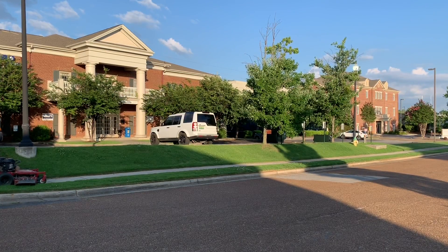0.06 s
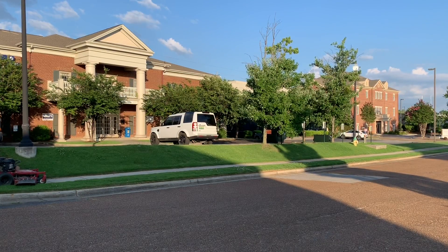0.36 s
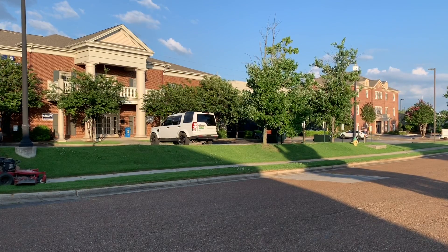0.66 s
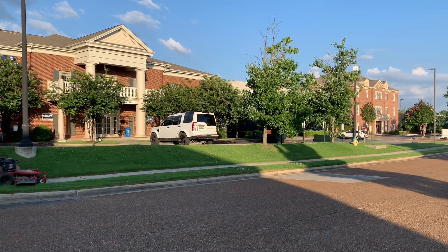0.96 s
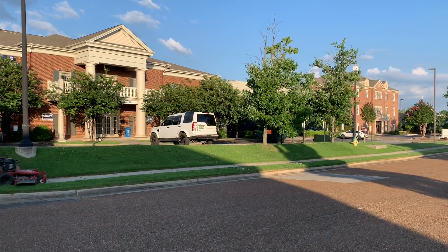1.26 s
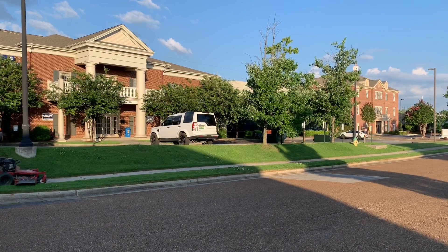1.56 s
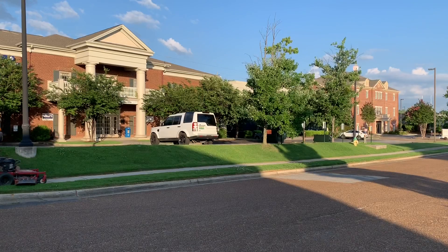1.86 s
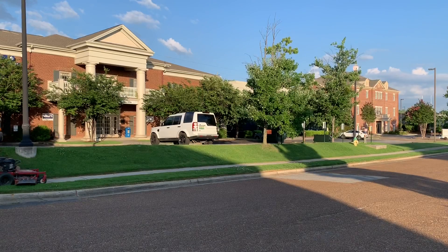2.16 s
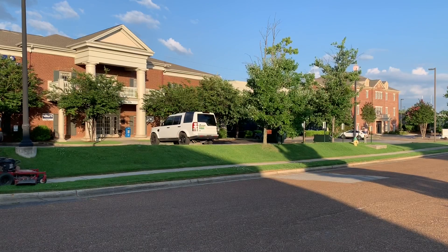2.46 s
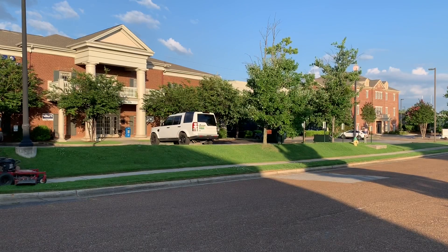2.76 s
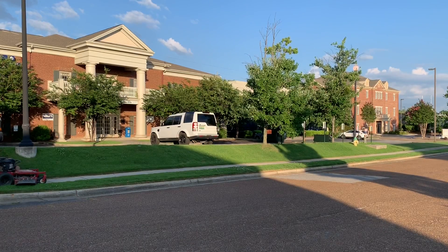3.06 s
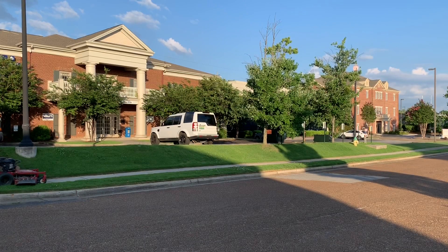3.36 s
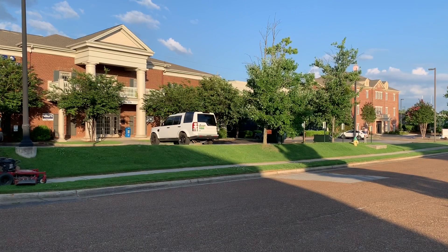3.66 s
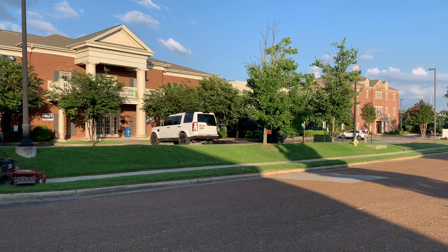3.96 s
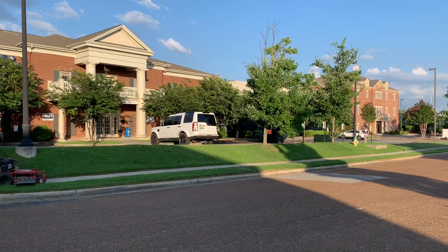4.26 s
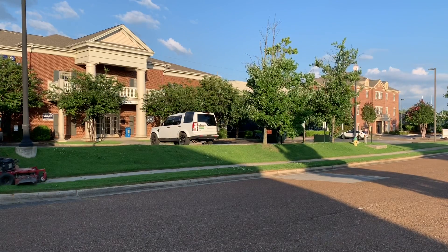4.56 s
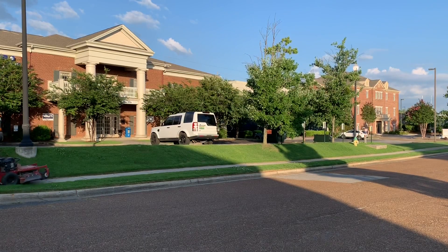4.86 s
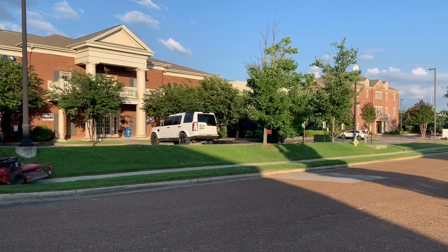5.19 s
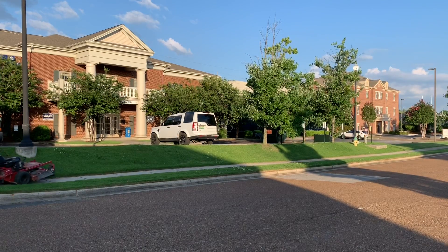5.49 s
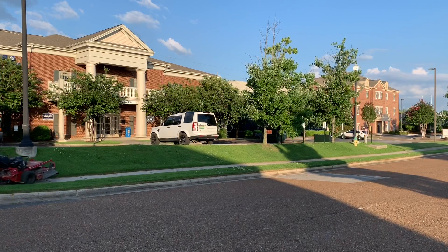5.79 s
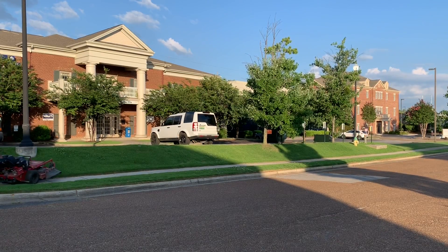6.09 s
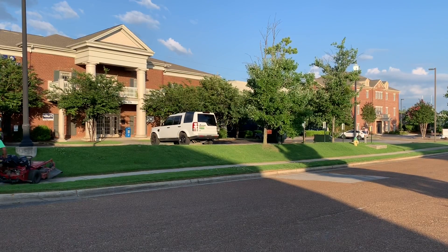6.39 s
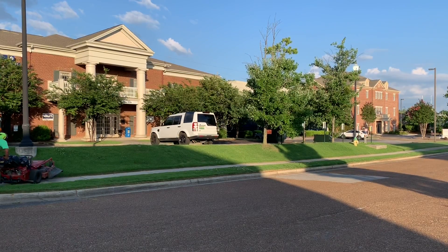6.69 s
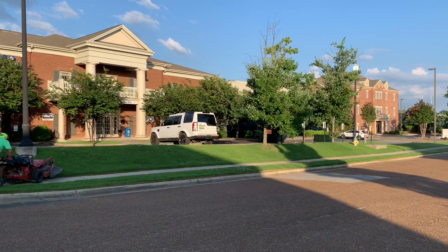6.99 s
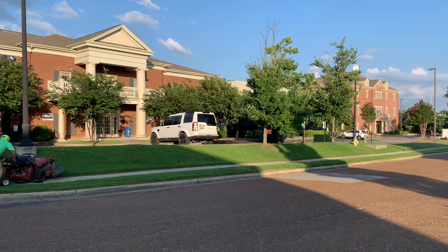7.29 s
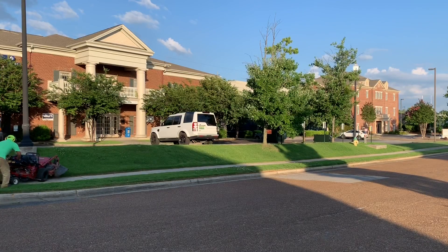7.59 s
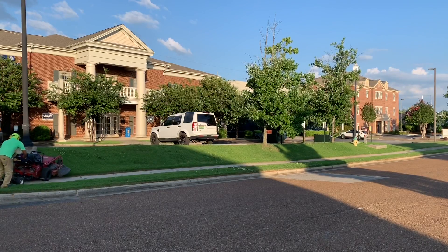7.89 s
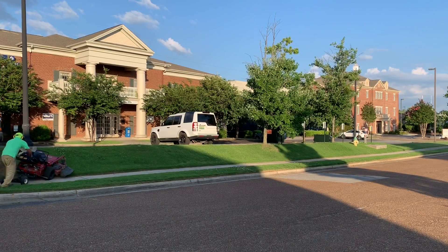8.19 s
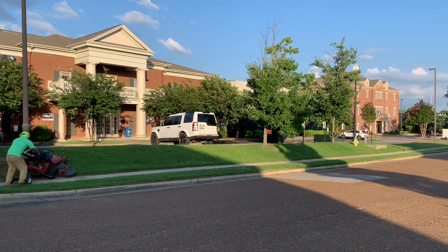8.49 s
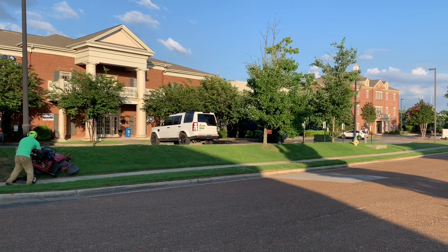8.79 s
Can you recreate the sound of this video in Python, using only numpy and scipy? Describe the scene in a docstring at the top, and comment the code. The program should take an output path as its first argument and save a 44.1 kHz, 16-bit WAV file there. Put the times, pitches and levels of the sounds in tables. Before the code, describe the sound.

A petrol walk-behind mower idles outdoors, puttering with ticking valves over a low wind-like rumble. Dull knocks and light gusts bump the microphone during the first second. At about 1.5 seconds a lever clacks with brief bright scrapes. At 1.9 seconds the throttle opens and the engine revs up, louder, its pitch wavering briefly. A dull thump comes at 2.8 seconds. At 3.2 seconds the blades engage with a rasp and the engine sags sharply, recovering by about 4.4 seconds. From there it mows loudly and steadily, with a wavering blade hum, a rough high whine, rushing air and hissing grass. The cutting thickens around 5.4 seconds, and the mower's deck booms more fully around 7 seconds. The hiss and ticking ease slightly as it turns away, still running at the end, near 9 seconds.

```python
"""Petrol mower across a street

A walk-behind mower with a V-twin engine idles, is throttled up, sags as the blades are clutched in,
recovers, mows and swings its deck away. Periodic excitation sets the sound: each four-stroke cycle
gives two exhaust pulses and four valve hits, the blades hum and rush, and their drive whines.
A low wind-like rumble swells and ebbs behind it. Knocks, a lever and light gusts are heard early on."""
import sys
import numpy as np
from scipy import signal
from scipy.fft import rfft, irfft, next_fast_len
from scipy.io import wavfile
from scipy.ndimage import uniform_filter1d

SR = 44100
rng = np.random.default_rng(int(sys.argv[2]) if len(sys.argv) > 2 else 0)


def master_out(mix):
    """Clip the mix to full scale and print it as 16-bit PCM to the path in sys.argv[1]."""
    frames = np.transpose(np.atleast_2d(mix))
    ceiling = np.clip(frames, -1, 1)
    pcm = np.round(ceiling * 32767).astype(np.int16)
    wavfile.write(sys.argv[1], SR, pcm)


N = 389844
T = np.arange(N) / SR

IDLE_RATE, THROTTLE_S = 15.43, 1.91  # four-stroke cycles per second; when the throttle opens
FIRING_PLACES, BLADE_PASSES_PER_CYCLE = (0, .375), 4.41
CLUTCH_S, SAG_S, RECOVER_S = 3.18, .24, .91  # when the clutch bites; lengths of the fall and the recovery
# hardest work, in the run-up and as the blades reach speed: (centre [s], half-width [s])
REVVING, STRAINING = (2.08, 0.24), (3.93, 0.32)
# a thick patch of grass, and the deck side-on to the listener: (centre [s], half-width [s])
THICK_GRASS, BROADSIDE = (5.4, 0.51), (7.18, 1)

# engine parts: (idle level [dB], running level [dB], then change [dB] with revving, blades engaged,
# sagging speed, straining, swinging away)
EXHAUST_DB = (-44.5, -37.5, 4, 4, 0.5, 5, 2)
VALVE_HISS_DB = (-55, -47.5, 2, 4.5, 0, 1.5, -3.5)
ROCKER_DB = (-39, -31.5, -1, 0.5, -2, -0.5, -10.5)
SEAT_DB = (-38.5, -40.5, 3, -1.5, 6, 6, -4)
CASING_DB = (-37, -29.5, -0.5, 4, -0.5, -1, 1)
# deck sounds: (level [dB], then change [dB] with sagging speed, facing side-on, swinging away)
WHINE_DB, RUSH_DB, GRASS_DB = (-23, -16, 3, -0.5), (-27, -0.5, 2, -6.5), (-31.5, -3, 3, -5.5)

# wind-like background rumble: (early level [dB], later level [dB], then five changes [dB] in staged_level)
RUMBLE_DB = (-32.5, -23.5, -0.5, -2.5, 0, 3.5, 2.5)
# its brief swells and ebbs: (centre [s], half-width [s], change [dB])
RUMBLE_SWELLS = [(0.319, 0.33, 4.5), (.92, 0.1, 3), (2.15, .2, 2.5), (2.95, .3, -1.5), (3.65, 0.26, 2.5),
                 (5.68, 0.11, 4), (5.91, 0.045, 6), (6.75, 0.26, 1.5)]
# light gusts: (centre [s], half-width [s], level [dB])
WIND_GUSTS = [(.22, 0.077, -35), (.38, 0.048, -30), (.78, 0.046, -28), (.91, 0.055, -41),
              (1.045, .025, -34)]
# dull knocks: (time [s], pitch [Hz], thud level [dB], puff level [dB])
DULL_KNOCKS = [(0.167, 126, -26, -33), (0.19, 190, -27, -28), (0.286, 150, -30, -31), (0.329, 75, -16, -34),
               (0.391, 230, -16, -20.5), (0.467, 140, -21, -26), (.643, 109, -19, -31),
               (0.739, 170, -16, -31), (0.773, 240, -30, -25), (0.855, 140, -14, -34), (.893, 70, -13, -35),
               (1.022, 95, -12, -36), (1.368, 55, -17, -35), (1.695, 65, -11, -27), (2.776, 132, -5, -29),
               (3.007, 70, -9, -34)]
# bright scrapes: (time [s], length [s], level [dB])
BRIEF_SCRAPES = [(1.439, 0.046, -38), (1.485, 0.064, -33), (1.525, .02, -41), (3.07, 0.08, -32.5),
                 (7.772, 0.047, -50), (8.654, 0.018, -29)]
# lever impacts: (time [s], level [dB])
LEVER_CLACKS = [(1.453, -29.5), (1.504, -39), (1.527, -28)]
# modes rung by the lever: (frequency [Hz], relative level [dB], time to fall 60 dB [s])
HANDLE_MODES = [(455, -2, 0.1), (560, -6, 0.072), (817, -4, 0.044), (3760, -1, .035), (4300, -7, 0.13),
                (7250, -9, .07)]
# speed set by the governor: (time [s], rate [cycles/s])
GOVERNED_SPEED = [(2.2, 26.85), (4.45, 26.8), (5, 26.3), (5.55, 26.22), (6.65, 26.52), (7.4, 26.3),
                  (7.8, 26.63), (8.6, 26.07)]
# fan and pulley tones: (start [s], end [s], multiple of the cycle rate [1], flutter width [Hz],
# steady part against flutter [1], level [dB])
PULLEY_TONES = [(2.21, 2.39, 42, 7.1, -1, -39.5), (2.4, 2.95, 42, 9, 1.5, -39),
                (3.3, 4.25, 45, 130, -0.5, -31.5), (3.5, 8.836, 152.5, 27, 0, -45),
                (8.3, 8.46, 151, 26, -1, -35.5), (4.46, 6.6, 248, 25, 0, -52),
                (5.55, 6.37, 38, 20, 1, -32.5), (5.15, 6.45, 46.5, 80, -3, -37),
                (5.2, 8.293, 58.8, 3.1, 2.3, -37.5), (4.9, 8.3, 57.7, 13, 2, -47.5),
                (6.803, 10, 51.5, 16, 2, -41.5), (7.003, 8.843, 15.35, 9.5, -0.5, -33)]
# valve hits: (place in the cycle [0-1], then gain [1] of idle tick, running tick, idle ring, running ring)
VALVE_HITS = [(.095, 0.26, 0.13, 0.6, 1), (0.429, 0.66, 0.71, 0.46, .4), (.52, .1, .1, 0.73, 1),
              (.82, 0.15, 0.36, 0.21, .15)]
# casing modes that stand out at idle: (frequency [Hz], width [Hz], level [dB])
CASING_MODES = [(1750, 53, -49), (2940, 77, -66), (1294, 24, -58), (544, 18, -65), (211.5, 3, -41.5)]
# high modes of the deck: (frequency [Hz], width [Hz], level [dB])
DECK_MODES = [(3450, 35, -39.5), (4020, 34, -42), (4970, 38, -50), (6580, 40, -53)]
# hum that fades and returns as the blades drift in and out of step:
# (time [s], then level [dB] of blade-pass harmonics 1 to 4)
LOW_HARMONICS = [(3.55, -33, -31, -39, -40), (3.8, -22.5, -33, -31.5, -53), (4, -21, -23, -21, -29.5),
                 (4.2, -21, -22.5, -24, -24.5), (4.55, -17, -21, -29.5, -34),
                 (4.75, -18.5, -20.5, -27.5, -38), (5, -20.5, -25, -28.5, -28), (5.3, -20, -30.5, -33, -28),
                 (5.5, -21, -37, -32, -38), (5.75, -28, -43, -33, -32), (6.2, -44, -43, -32.5, -35),
                 (6.65, -44, -44, -26, -35), (7.15, -30, -29, -27.5, -31.5),
                 (7.35, -19.5, -33.5, -29.5, -31), (7.75, -18.5, -20, -30, -39),
                 (8.25, -17.5, -23.5, -34, -31), (8.65, -18.5, -18.5, -37, -42)]
# upper blade-pass harmonics: (harmonic [1], level [dB], change side-on [dB], change swung away [dB])
HIGH_HARMONICS = [(5, -40, 2.5, -2), (6, -40, 1.5, -7), (7, -40.5, 1, -3)]

# spectral envelopes of the sources: (frequency [Hz], relative spectral density [dB])
RUMBLE_SPECTRUM = [(10, -41), (28, -9.5), (50, 3.5), (75, 0), (110, 1), (160, -7.5), (230, -10),
                   (330, -19.5), (500, -44), (1500, -84)]
GUST_SPECTRUM = [(40, -8), (130, 8.5), (300, 0), (520, -8), (750, -25), (1500, -45)]
KNOCK_SPECTRUM = [(40, -2), (120, 1.5), (310, 1.5), (550, -1), (900, -14), (1500, -46), (4000, -70)]
SCRAPE_SPECTRUM = [(1500, 7), (4000, 10.5), (6000, 2), (8500, 9), (12000, 2), (16000, -38)]
VALVE_HISS_SPECTRUM = [(1000, -21), (3500, 4), (4600, -12), (6200, 4.5), (7200, 6.5), (7700, 3.5),
                       (8300, 9), (10200, -0.5), (12000, 5.5), (14300, -4), (16000, 0)]
ROCKER_SPECTRUM = [(1500, -23), (3500, -3), (5500, -14), (8300, 0), (9800, -3), (10800, 11.5), (12300, -5),
                   (14000, 4.5), (16000, -4)]
SEAT_SPECTRUM = [(1500, -29), (3500, -0.5), (4600, -9), (6600, -11), (7250, 6.5), (7750, -21), (8350, 3.5),
                 (9300, -11), (16000, -22)]
CASING_SPECTRUM = [(100, 6.5), (350, 9), (600, 4), (1000, 2.5), (1400, 1), (1720, 4), (2200, -4.5),
                   (2750, 4.5), (4050, -2), (4550, -16), (5200, -5), (5900, -25), (7200, -17.5),
                   (15000, -24)]
INTAKE_SPECTRUM = [(30, -5), (90, 22), (200, 14.5), (350, 5), (800, -3), (1300, 1), (1700, -23), (2400, 0),
                   (4400, -22), (5300, -6), (5800, -9), (6400, -14), (7800, -13), (8600, -13), (10500, -30),
                   (16000, -35)]
MUFFLER_SPECTRUM = [(20, -28), (45, -8), (80, -19), (130, 2), (210, 1), (270, -5), (320, -32), (410, -9),
                    (600, -17), (1200, -42), (3000, -72)]
RUSH_SPECTRUM = [(60, -27), (200, 0.5), (300, 6), (420, 6.5), (540, 5), (660, 0), (1000, 4), (1300, 2.5),
                 (1650, -5), (2000, -8), (3000, -48), (8000, -43)]
GRASS_SPECTRUM = [(1000, -6), (2000, -13), (2350, 8.5), (2650, 3), (3100, 4), (4050, 2), (4270, -8.5),
                  (4750, 0.5), (5000, 1), (5900, -6.5), (6600, -9), (7600, -19), (8600, -18), (12000, -69),
                  (16000, -40)]
CHUG_SPECTRUM = [(30, -12), (65, 10), (150, 3), (250, 3), (350, -1), (560, -11), (900, -22), (2000, -48)]
BOOM_SPECTRUM = [(150, -28), (320, 6), (430, 10), (560, 8), (720, -40), (2000, -54)]

# likeness of the two microphone ports: (frequency [Hz], coherence [0-1])
PORT_COHERENCE = [(50, .92), (130, .95), (300, .91), (1000, .86), (2000, .985), (2300, .99), (3800, .83),
                  (5000, .7), (6000, .5), (7000, .7), (8700, .72), (9800, .95), (12500, .8), (15500, .9)]
# phase by which the left port leads: (frequency [Hz], lead before the bearing factor [rad])
PORT_LEAD = [(20, 0), (250, .33), (550, .45), (850, .55), (1500, 2.1), (2150, 3.1), (2800, 3.7),
             (3700, 4.9), (4300, 5.2), (5100, 7.0), (5700, 6.8), (6800, 8.2), (9800, 3.14), (13600, -3.14),
             (15500, -6.3)]
# shading between the ports: (frequency [Hz], left minus right [dB])
PORT_SHADING = [(130, 1), (300, 1.5), (500, 1.5), (770, 7.5), (1170, 9), (1790, 0.5), (2700, -2.5),
                (4100, 1.5), (4900, -6.5), (6500, -4.5), (7600, -0.5)]
# the mower moves towards the front: (time [s], factor on the lead [1])
BEARING_FACTOR = [(0, 1.065), (3.5, 1.06), (6, 1.01), (8.84, 0.92)]


def amp(db):
    """Amplitude ratio of a level in decibels."""
    return 10 ** (np.asarray(db) / 20)


def unit(x):
    """Normalisation to rms 1."""
    return x / np.sqrt(np.mean(x ** 2) + 1e-20)


def curve(rows, column=1):
    """Linear interpolation of one column of a time table at every sample."""
    rows = np.asarray(rows)
    return np.interp(T, rows[:, 0], rows[:, column])


def spectrum_at(points, hz):
    """Interpolation of a spectrum table on a log-frequency axis."""
    f, value = np.transpose(points)
    return np.interp(np.log(hz + 1), np.log(f + 1), value)


def ramp(start, length):
    """Linear rise from 0 to 1."""
    return np.clip((T - start) / length, 0, 1)


def fade(start, end, edge_s):
    """Trapezoidal window; it stays open if it outlasts the scene."""
    return ramp(start, edge_s) * np.clip((end - T) / edge_s + (end >= T[-1]), 0, 1)


def bell(centre, half_width):
    """Gaussian swell from 0 to 1 and back."""
    return np.exp(-((T - centre) / half_width) ** 2)


def noise():
    """Uncorrelated white noise on two paths: direct and scattered."""
    return rng.standard_normal((2, N))


def drift(hz):
    """Low-pass random fluctuation of rms 1, up to about hz."""
    coarse_t = T[::64]
    f = np.fft.rfftfreq(8192, coarse_t[1])
    wander = irfft(rfft(rng.standard_normal(8192)) * np.exp(-(f / hz) ** 2))
    return np.interp(T, coarse_t, unit(wander[:len(coarse_t)]))


def colour(x, spectrum, band_hz=(0, SR)):
    """Linear filtering by a spectral envelope, scaled to rms 1 within the band."""
    size = next_fast_len(N, real=True)
    hz = np.fft.rfftfreq(size, 1 / SR)
    shaped = rfft(x - x.mean(), size) * amp(spectrum_at(spectrum, hz))
    inside = shaped[:, (hz >= band_hz[0]) & (hz <= band_hz[1])]
    return irfft(shaped, size)[:, :N] * np.sqrt(N * size / np.sum(abs(inside) ** 2))


def tone(turns, width_hz, steady=0):
    """Line broadening: random amplitude and phase flutter spread a tone, carried on both paths."""
    phasor = (steady + drift(width_hz) + 1j * drift(width_hz)) * np.exp(2j * np.pi * turns)
    return unit(np.array([phasor.real, phasor.imag]))


def waver(x, depth_db=2.6, patch_hz=25, patch_s=.07):
    """Frequency-selective fading: narrow bands swell and fade independently."""
    hz, t, bins = signal.stft(x, SR, nperseg=2048, noverlap=1536)
    field = rng.standard_normal(bins.shape[1:])
    field = uniform_filter1d(field, max(1, round(patch_hz / hz[1])), axis=0)
    field = uniform_filter1d(field, max(1, round(patch_s / t[1])), axis=1)
    return signal.istft(bins * amp(depth_db * unit(field)), SR, nperseg=2048, noverlap=1536)[1][:, :N]


def sag(labour_s=.08):
    """Inertial load, 0-1: the clutch drags the engine down quickly; it labours and slowly recovers."""
    fall = np.sin(np.pi / 2 * ramp(CLUTCH_S, SAG_S))
    recovery = np.sin(np.pi / 2 * ramp(CLUTCH_S + SAG_S + labour_s, RECOVER_S))
    return fall - recovery


def turned():
    """Heading of the deck, 0-1, as it swings away from the listener."""
    return ramp(start=5.14, length=3.67)


def engine_speed(run_up_s=.3, hunt_start_s=2.24, first_swing_s=.375, hunt_rate=.88, sag_rate=8.6):
    """Governed speed in cycles per second: idle, run-up, ever slower hunting, and sag under load."""
    run_up = (1 - np.cos(np.pi * ramp(THROTTLE_S, run_up_s))) / 2
    swings = (np.maximum(T - hunt_start_s, 0) / first_swing_s) ** .64
    hunting = hunt_rate * np.sin(2 * np.pi * swings) * (1 - ramp(CLUTCH_S, SAG_S))
    return IDLE_RATE + run_up * (curve(GOVERNED_SPEED) - IDLE_RATE) + hunting - sag_rate * sag()


def staged_level(early_db, later_db, revving_db, blades_db, sag_db, straining_db, away_db):
    """Gains add in decibels: a level steps and swells at the times of run-up, clutching and turning."""
    step = ramp(THROTTLE_S, 0.016) * (later_db - early_db + revving_db * bell(*REVVING))
    changes = blades_db * ramp(CLUTCH_S, SAG_S) + sag_db * sag() + straining_db * bell(*STRAINING)
    return early_db + step + changes + away_db * turned()


def deck_level(db, sag_db, side_db, away_db):
    """Directivity and sagging speed set the level of a deck sound, in decibels."""
    return db + sag_db * sag() + side_db * bell(*BROADSIDE) + away_db * turned()


def firings(cycle, uneven):
    """Impulse train of the two cylinders; combustion varies, so no two impulses are alike."""
    impulses = np.zeros(N)
    for place in FIRING_PLACES:
        at = np.flatnonzero(np.diff(np.floor(cycle - place)))
        impulses[at] += 1 + uneven * rng.standard_normal(N)[at]
    return impulses


def firing_envelope(cycle, decay_cycles):
    """Exponential decay after each firing."""
    return sum(np.exp(-((cycle - place) % 1) / decay_cycles) for place in FIRING_PLACES)


def strikes(cycle, place, decay_s, rattle=0, rattle_cycles=0.22):
    """Envelope of a damped impact once a cycle: a sharp peak and an optional rattle after it."""
    since = (cycle - place) % 1
    return np.exp(-since / engine_speed() / decay_s) + rattle * np.exp(-since / rattle_cycles)


def steel_ringing(cycle, ring_s=.04):
    """Convolution of the firings with the dense modes of steel gives closely spaced overtones."""
    response = noise()[:, :SR // 8] * np.exp(-T[:SR // 8] / ring_s)
    return unit(signal.oaconvolve(firings(cycle, uneven=.15)[None], response, axes=1)[:, :N])


def wind_rumble(lumpy_db=1.0):
    """Low-frequency turbulence: a wind-like rumble swells and ebbs in the background."""
    swells_db = sum(db * bell(s, half_width) for s, half_width, db in RUMBLE_SWELLS)
    gain = amp(staged_level(*RUMBLE_DB) + swells_db + lumpy_db * drift(hz=5))
    return gain * colour(noise(), RUMBLE_SPECTRUM, band_hz=(25, 95))


def buffeting(flutter_db=4.5):
    """Turbulent pressure: light gusts flutter unevenly over the microphone."""
    gusts = sum(amp(db) * bell(s, half_width) for s, half_width, db in WIND_GUSTS)
    return gusts * amp(flutter_db * drift(hz=35)) * colour(noise(), GUST_SPECTRUM)


def knocks(attack_s=0.0022, puff_s=0.011, decay_periods=0.82):
    """Heavily damped oscillation: each knock is a low thud with a puff of noise."""
    thuds, puffs = np.zeros((2, N)), np.zeros(N)
    for s, hz, thud_db, puff_db in DULL_KNOCKS:
        turns = hz * np.maximum(T - s, 0)
        thud_decay = np.exp(-np.minimum(turns / decay_periods, 20))
        thuds[0] += amp(thud_db) * np.sin(2 * np.pi * turns) * thud_decay
        puff_decay = np.exp(-np.minimum(abs(T - s) / puff_s, 20))
        puffs += amp(puff_db) * ramp(s - attack_s, attack_s) * puff_decay
    return thuds + puffs * colour(noise(), KNOCK_SPECTRUM)


def scrapes():
    """Friction noise in short, bright bursts."""
    bursts = sum(amp(db) * fade(s, s + length, length / 3) for s, length, db in BRIEF_SCRAPES)
    return bursts * colour(noise(), SCRAPE_SPECTRUM)


def lever(attack_s=.001):
    """Free vibration: a control lever hits its stop and the modes of the handle ring down."""
    out, t = np.zeros((2, N)), T[:SR // 3]
    for s, db in LEVER_CLACKS:
        ring = sum(amp(db + mode_db - 60 * t / t60) * np.exp(2j * np.pi * (hz * t + rng.random()))
                   for hz, mode_db, t60 in HANDLE_MODES)
        start = round(s * SR)
        out[:, start:start + len(t)] += np.array([ring.real, ring.imag]) * np.minimum(t / attack_s, 1)
    return out


def fan(cycle, level_db=-43):
    """Rotational tone: the cooling fan whistles faintly from the run-up until the clutch bites."""
    whistle = tone(48 * cycle, width_hz=30, steady=4)
    return amp(level_db) * fade(2.12, CLUTCH_S + 0.047, edge_s=0.13) * whistle


def drive_whine(cycle, multiple=94.2, flutter_db=2.2):
    """Rotational tone with noise sidebands: the blade drive sings with a rough edge."""
    core = tone(multiple * cycle, width_hz=36, steady=1.7)
    gain = amp(deck_level(*WHINE_DB) + flutter_db * drift(hz=21)) * ramp(CLUTCH_S + SAG_S, RECOVER_S)
    sidebands = tone(multiple * cycle, width_hz=130)
    return gain * unit(core + 0.65 * sidebands)


def pulleys(cycle):
    """Engine orders: thin fan and pulley tones come and go at multiples of the cycle rate."""
    return sum(amp(db) * fade(start, end, edge_s=0.12) * tone(multiple * cycle, width_hz, steady)
               for start, end, multiple, width_hz, steady, db in PULLEY_TONES)


def casing(cycle, hits, running, sag_db=-6):
    """Forced vibration: valve hits and firings shake the casing amid cooling air; modes ring at idle."""
    buzz = .45 * steel_ringing(cycle)
    shaken = colour(noise() * (1 + 0.44 * hits) + buzz, CASING_SPECTRUM)
    modes = sum(amp(db) * tone(hz * T, width_hz) for hz, width_hz, db in CASING_MODES)
    return amp(staged_level(*CASING_DB) + sag_db * sag()) * shaken + (1 - running) * modes


def valve_gear(cycle):
    """Periodic impacts: rockers tick and valves ring on their seats over a hiss, shaking the casing."""
    speed = engine_speed()
    running = np.clip((speed - speed[0]) / (speed[-1] - speed[0]), 0, 1)  # 0 at idle, 1 at speed
    ticks, rings = np.zeros(N), np.zeros(N)
    for place, tick_idle, tick_fast, ring_idle, ring_fast in VALVE_HITS:
        tick_gain = tick_idle + running * (tick_fast - tick_idle)
        ring_gain = ring_idle + running * (ring_fast - ring_idle)
        ticks += tick_gain * strikes(cycle, place, decay_s=.0019, rattle=.38)
        rings += ring_gain * strikes(cycle, place, decay_s=.0055)
    top_hz = (10500, 13000)
    hiss_gain = amp(staged_level(*VALVE_HISS_DB) + drift(hz=23))
    hiss = hiss_gain * colour(noise(), VALVE_HISS_SPECTRUM, top_hz)
    rocker_gain = amp(staged_level(*ROCKER_DB) + 1.1 * drift(hz=30))
    rockers = rocker_gain * ticks * colour(noise(), ROCKER_SPECTRUM, top_hz)
    seat_gain = amp(staged_level(*SEAT_DB) + 1.1 * drift(hz=30))
    seats = seat_gain * rings * colour(noise(), SEAT_SPECTRUM, band_hz=(6800, 9000))
    return hiss + rockers + seats + casing(cycle, ticks + rings, running)


def intake(cycle, open_s=1.926, hold_s=0.31, gain_db=-25.5):
    """Pulsating flow: the cylinders gulp air through the open throttle until the governor closes it."""
    gulps = 0.62 + firing_envelope(cycle, decay_cycles=0.28)
    wide_open = ramp(open_s, .005) * (1 - ramp(open_s + hold_s, 0.064))
    return amp(gain_db) * wide_open * colour(waver(noise()) * gulps, INTAKE_SPECTRUM)


def chug(cycle, gain_db=-31.5):
    """Impulse response of the muffler: each firing thumps hard at the top of the run-up."""
    thumps = np.array([firings(cycle, uneven=.2), np.zeros(N)])
    return amp(gain_db) * bell(centre=2.2, half_width=0.096) * colour(thumps, CHUG_SPECTRUM)


def exhaust(cycle):
    """Source and filter: each firing sends a pulse and a puff of turbulent gas through the muffler."""
    pulses = np.array([unit(firings(cycle, uneven=0.36)), np.zeros(N)])  # direct path only
    gas = 0.72 * unit(firing_envelope(cycle, decay_cycles=0.11) * noise())
    return amp(staged_level(*EXHAUST_DB)) * colour(pulses + gas, MUFFLER_SPECTRUM, band_hz=(135, 205))


def clutch(cycle, level_db=-33, rasp_hz=930):
    """Sliding friction: the clutch rasps as it drags the blades up to speed, juddering at each firing."""
    judder = unit(1 + firing_envelope(cycle, decay_cycles=.16))
    slip = unit(waver(tone(rasp_hz * T, width_hz=120)))
    return amp(level_db) * fade(CLUTCH_S, 4.8, edge_s=0.014) * judder * slip


def deck_ring(waver_db=4.0, away_db=-1.5):
    """Resonance: a few high modes of the deck sing, wavering, once the blades turn."""
    modes = sum(amp(db + waver_db * drift(hz=6)) * tone(hz * T, width_hz)
                for hz, width_hz, db in DECK_MODES)
    return modes * ramp(CLUTCH_S, 0.31) * amp(away_db * turned())


def deck_boom(chop, gain_db=-26):
    """Directional radiation: the steel deck booms when side-on, and more weakly in thick grass."""
    swell = bell(*BROADSIDE) + 0.43 * bell(*THICK_GRASS)
    return amp(gain_db) * swell * colour(noise() * chop, BOOM_SPECTRUM)


def grit(count=900, low_hz=2600, high_hz=5600, ring_s=.026, spread_db=11):
    """Random impacts: bits of stalk and grit each ring four high modes of the deck."""
    out, t = np.zeros(N + SR, complex), T[:SR // 12]
    for when, size, *modes in rng.random((count, 6)):
        hz = low_hz + (high_hz - low_hz) * np.array(modes)[:, None]
        ping = np.exp(2j * np.pi * hz * t).sum(0) * np.exp(-t / ring_s)
        start = round((CLUTCH_S + when * (T[-1] - CLUTCH_S)) * SR)
        out[start:start + len(t)] += amp(spread_db * size ** 2) * ping
    return unit(np.array([out.imag, out.real])[:, :N])


def air_rush(chop, steel, thick_db=1.085):
    """Aerodynamic noise: the blade tips tear the air, mixed with the ringing of the deck."""
    torn_air = noise() * chop * amp(drift(hz=32))
    rush = colour(waver(torn_air + steel, depth_db=2), RUSH_SPECTRUM, band_hz=(600, 1500))
    return amp(deck_level(*RUSH_DB) + thick_db * bell(*THICK_GRASS)) * rush


def grass_cutting(cycle, steel, thick_db=3.5):
    """Broadband cutting noise: grass hisses over rasping steel and grit, louder in the thick patch."""
    rasp = waver(noise() + 1.9 * steel) + .3 * grit()
    throb = 1 + 0.02 * np.cos(4 * np.pi * cycle)
    hiss = colour(rasp * throb * amp(0.44 * drift(hz=29)), GRASS_SPECTRUM, band_hz=(3000, 5500))
    return amp(deck_level(*GRASS_DB) + thick_db * bell(*THICK_GRASS)) * ramp(CLUTCH_S, 0.13) * hiss


def mowing_noise(cycle):
    """Amplitude modulation: each blade pass chops the rush and boom; cutting and clutch noise join in."""
    chop = 1 + 0.16 * np.cos(2 * np.pi * BLADE_PASSES_PER_CYCLE * cycle)
    steel = .38 * steel_ringing(cycle)
    mowing = air_rush(chop, steel) + grass_cutting(cycle, steel)
    return mowing * ramp(3.167, 0.13) + clutch(cycle) + deck_boom(chop)


def blade_hum(cycle, flutter_db=0.56):
    """Harmonic series at the blade-pass frequency, made as the blades sweep past the deck wall."""
    turns = BLADE_PASSES_PER_CYCLE * cycle + 0.005 * drift(hz=15)
    harmonics = [(k, curve(LOW_HARMONICS, column=k)) for k in range(1, 5)]
    harmonics += [(k, deck_level(db, 0, side_db, away_db)) for k, db, side_db, away_db in HIGH_HARMONICS]
    hum = sum(amp(db + flutter_db * drift(hz=17)) * np.exp(2j * np.pi * (k * turns + rng.random()))
              for k, db in harmonics)
    return np.sqrt(2) * np.array([hum.real, hum.imag]) * ramp(3.42, 0.3)


def microphone_ports(paths):
    """Partial coherence: two ports hear both paths, with a lead and shading that depend on frequency."""
    hz, t, (direct, scattered) = signal.stft(paths, SR, nperseg=1024, noverlap=768)
    hz = hz[:, None]
    coherence = np.clip(spectrum_at(PORT_COHERENCE, hz), 0, 1)
    common = np.sqrt((1 + coherence) / 2) * direct
    apart = np.sqrt((1 - coherence) / 2) * scattered
    bearing = np.interp(t, *np.transpose(BEARING_FACTOR))
    lead = np.interp(hz, *np.transpose(PORT_LEAD)) * np.where(hz < 7500, bearing, 1)
    shading = amp(spectrum_at(PORT_SHADING, hz))
    left = (common + apart) * shading
    right = (common - apart) * np.exp(-1j * lead)
    pair = np.array([left, right]) * np.sqrt(2 / (1 + shading ** 2))  # keeps the total power
    return signal.istft(pair, SR, nperseg=1024, noverlap=768)[1][:, :N]


def scene():
    """Superposition of all sources; the turning parts share one slightly unsteady crankshaft."""
    cycle = np.cumsum(engine_speed() * (1 + .001 * drift(hz=8))) / SR  # four-stroke cycles elapsed
    background = wind_rumble() + buffeting() + knocks() + scrapes()
    whines = drive_whine(cycle) + pulleys(cycle) + fan(cycle)
    engine = exhaust(cycle) + chug(cycle) + intake(cycle) + valve_gear(cycle)
    deck = blade_hum(cycle) + mowing_noise(cycle) + deck_ring()
    return microphone_ports(background + lever() + whines + engine + deck)


def record(dry, knee=.7, headroom=.24, cutoff_hz=15900):
    """Soft saturation rounds the highest peaks; a low-pass filter then limits the band."""
    excess = np.maximum(abs(dry) - knee, 0)
    rounded = dry - np.sign(dry) * (excess - headroom * np.tanh(excess / headroom))
    low_pass = signal.firwin(511, cutoff_hz, window=("kaiser", 9), fs=SR)
    return signal.oaconvolve(rounded, low_pass[None], "same")


dry = scene()
out = record(dry)
master_out(out)
```